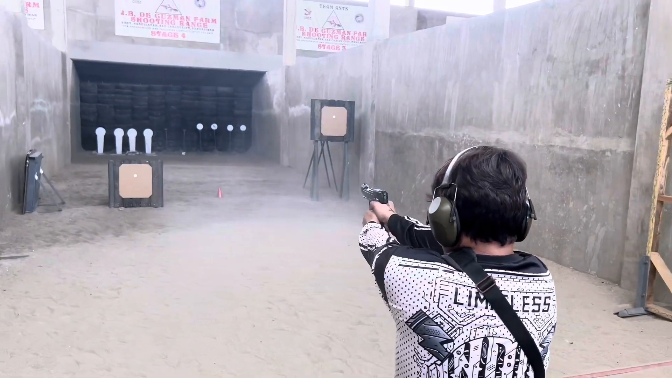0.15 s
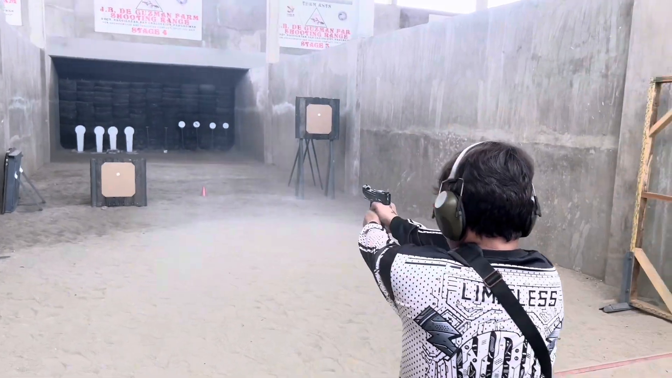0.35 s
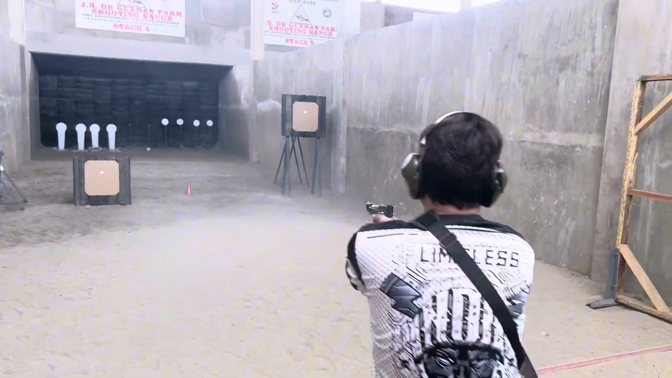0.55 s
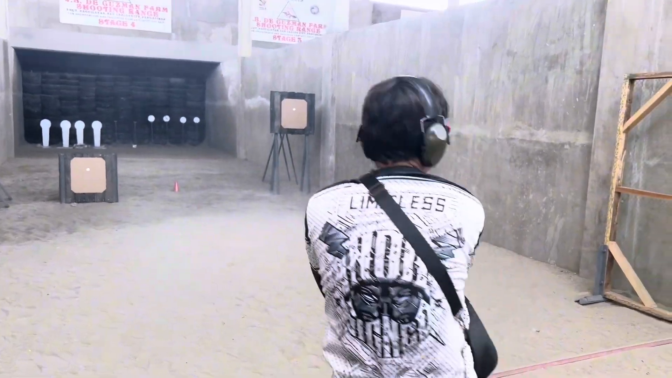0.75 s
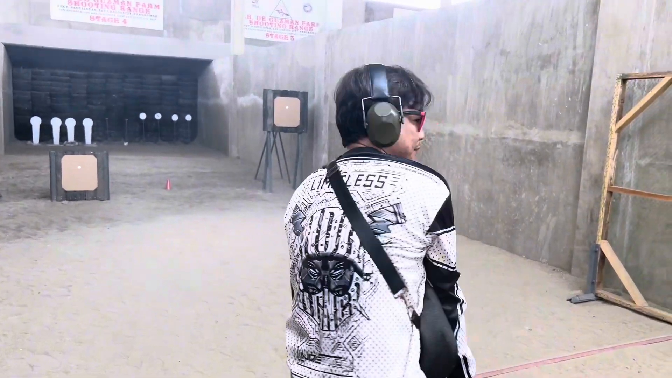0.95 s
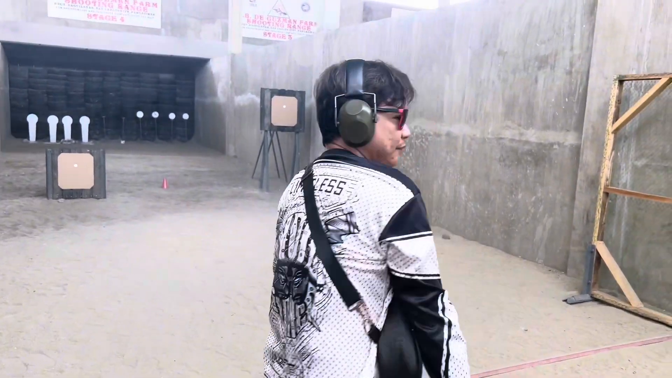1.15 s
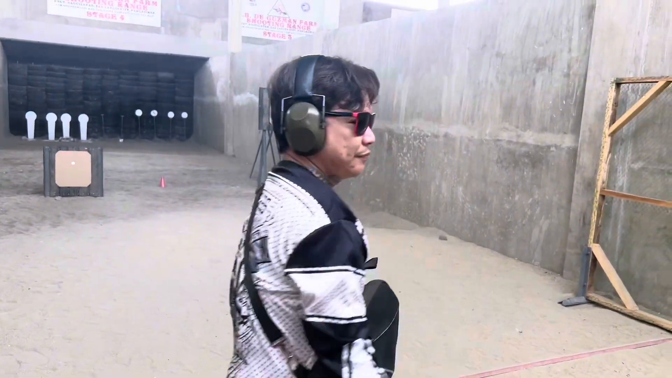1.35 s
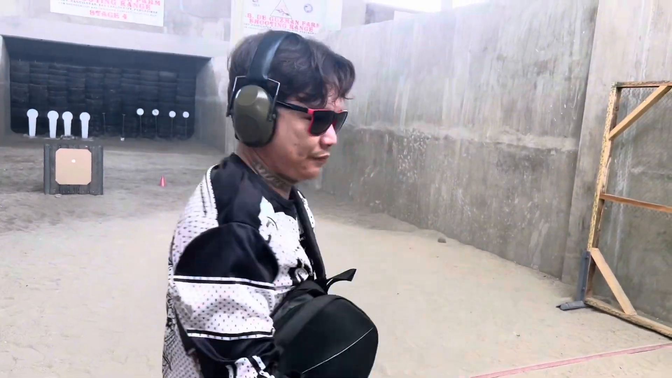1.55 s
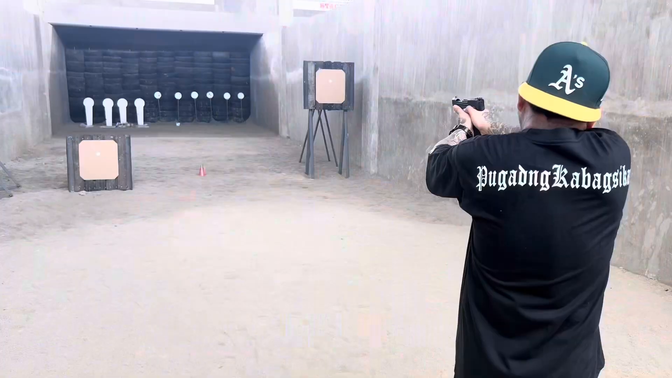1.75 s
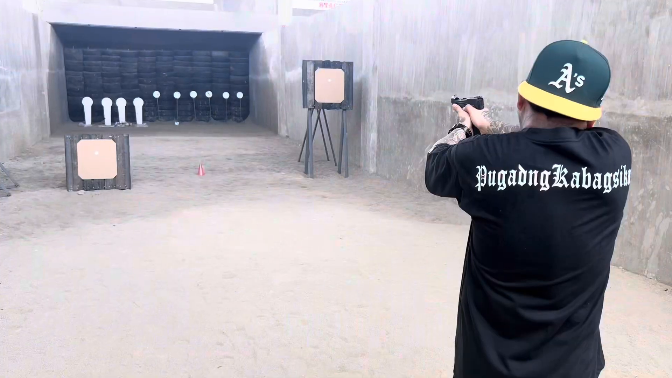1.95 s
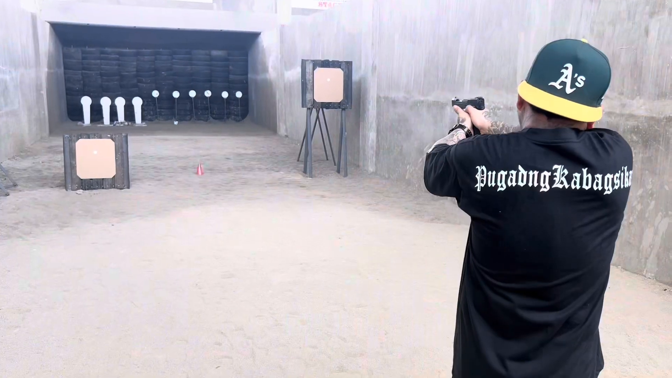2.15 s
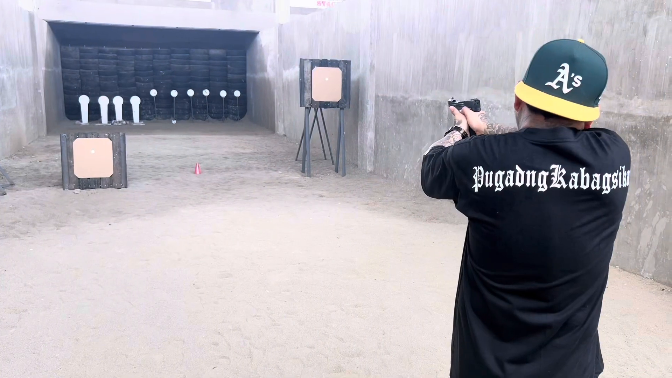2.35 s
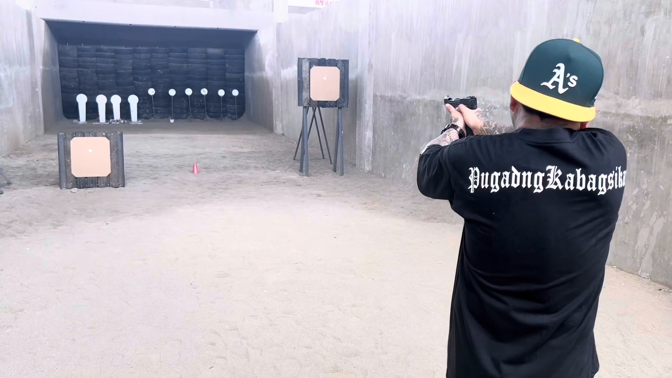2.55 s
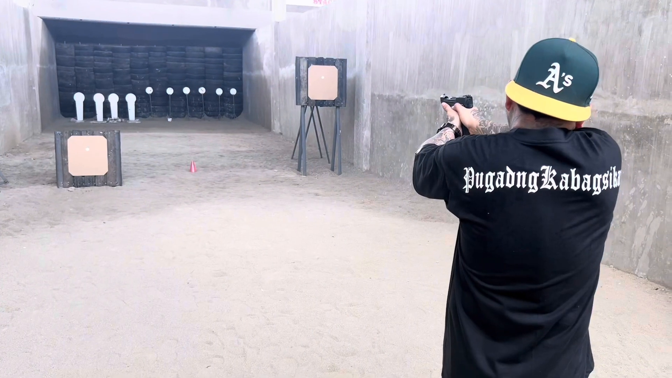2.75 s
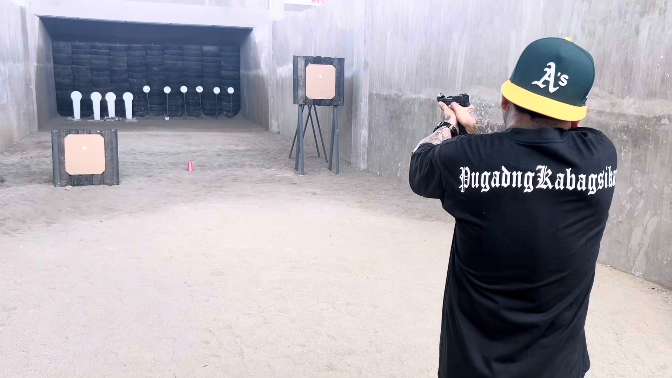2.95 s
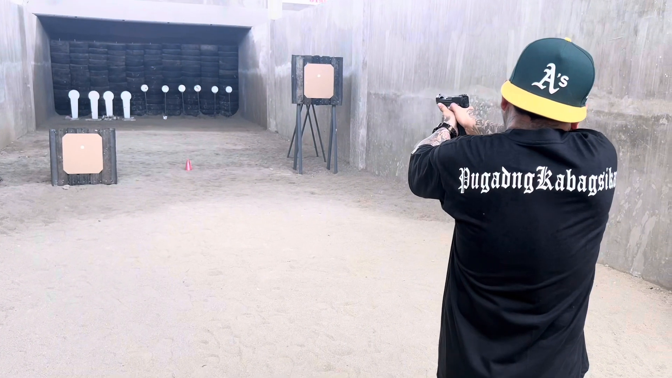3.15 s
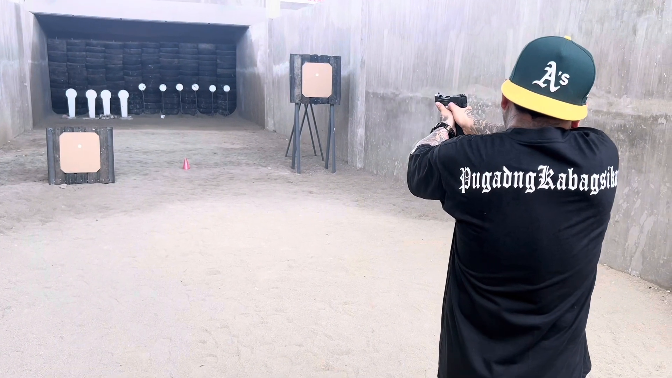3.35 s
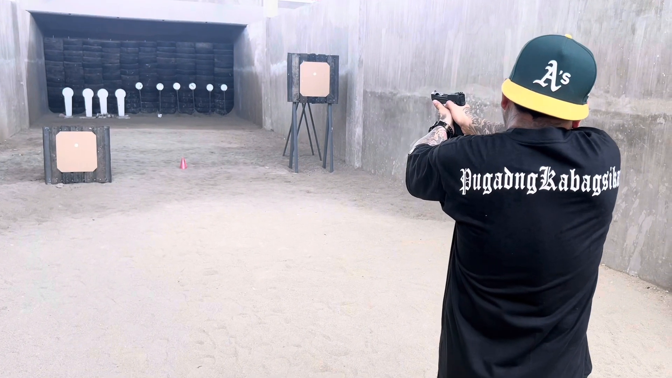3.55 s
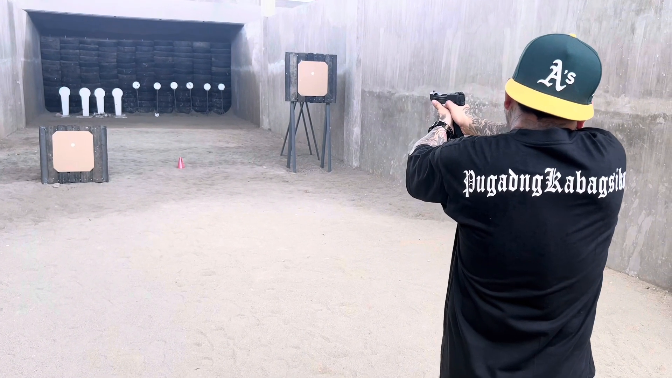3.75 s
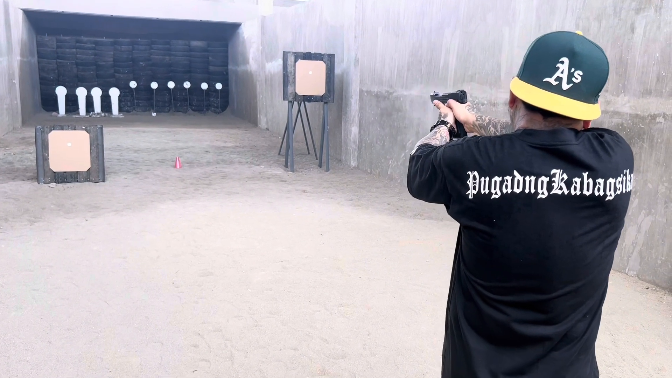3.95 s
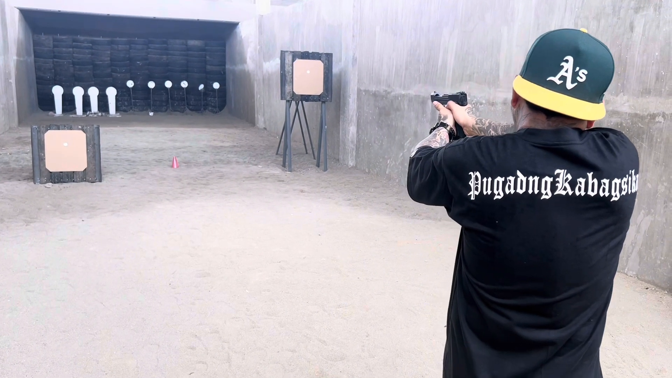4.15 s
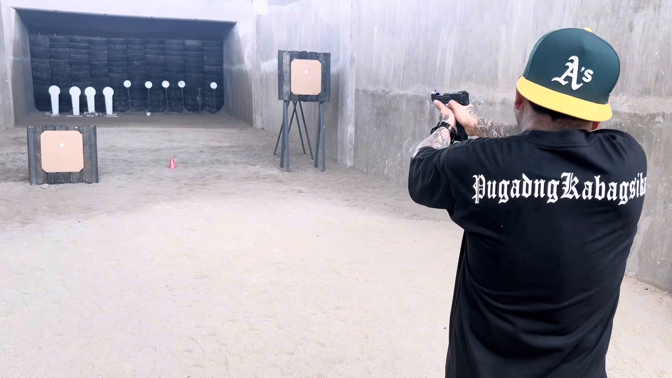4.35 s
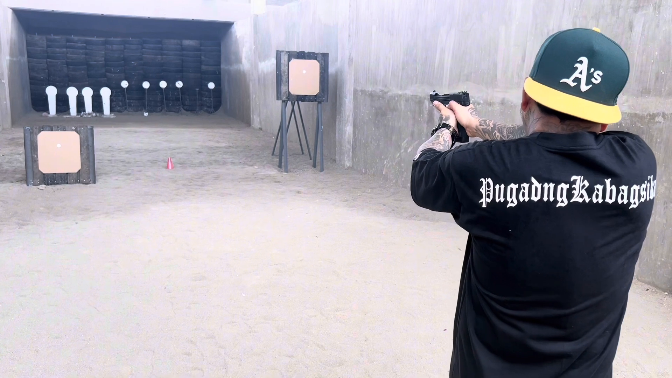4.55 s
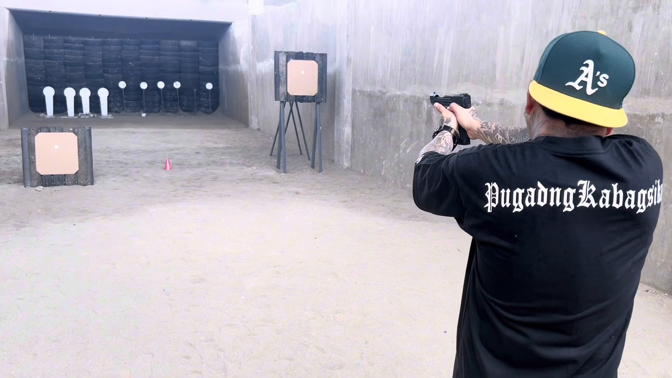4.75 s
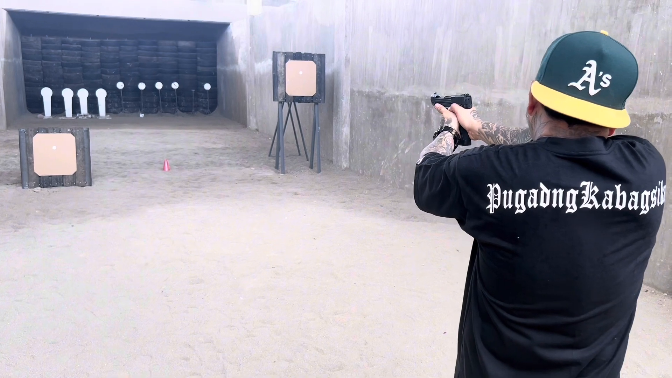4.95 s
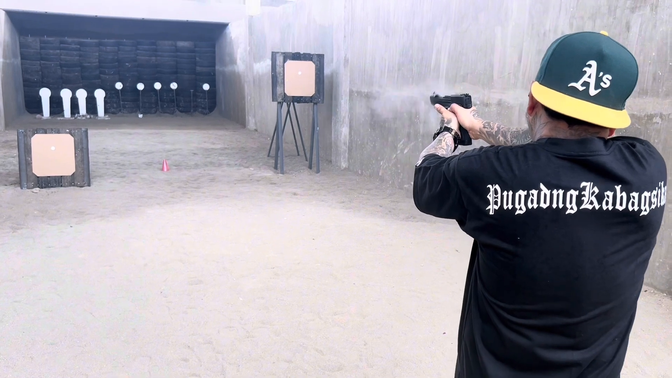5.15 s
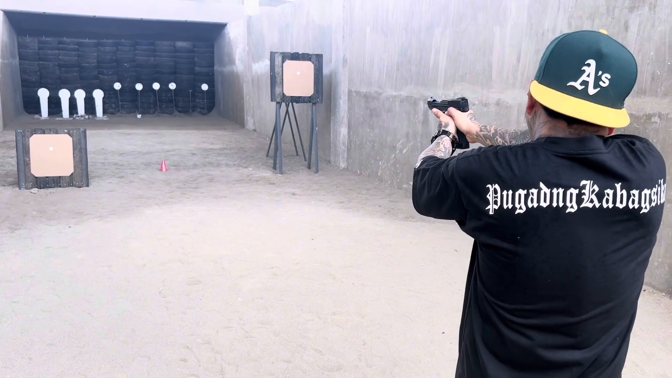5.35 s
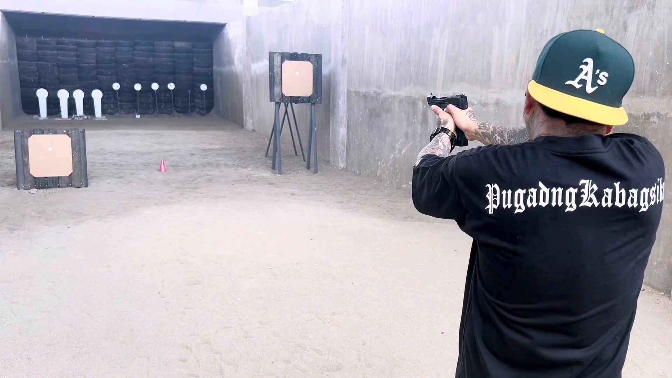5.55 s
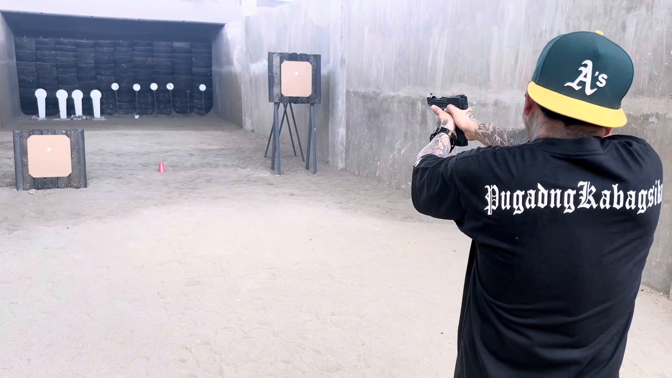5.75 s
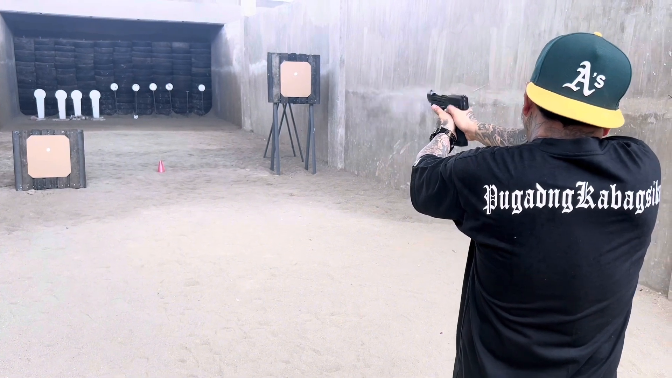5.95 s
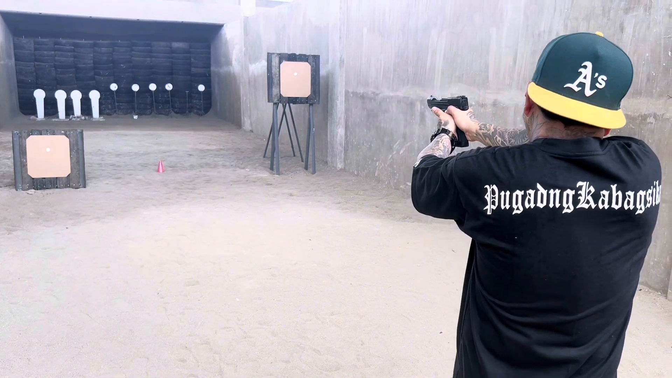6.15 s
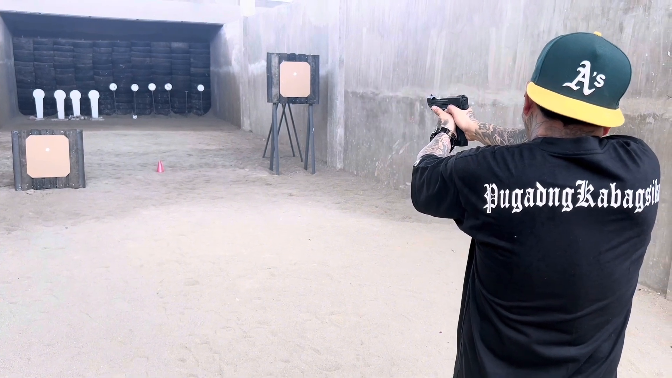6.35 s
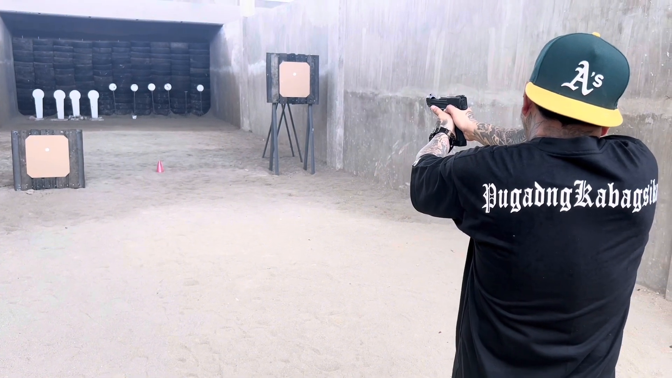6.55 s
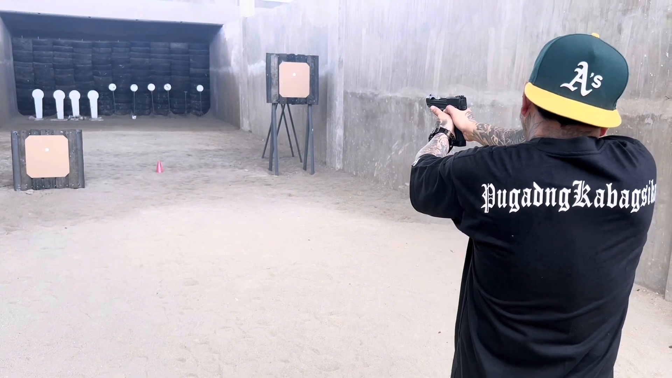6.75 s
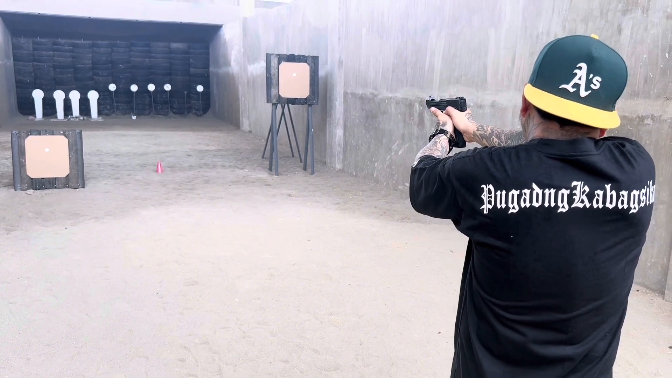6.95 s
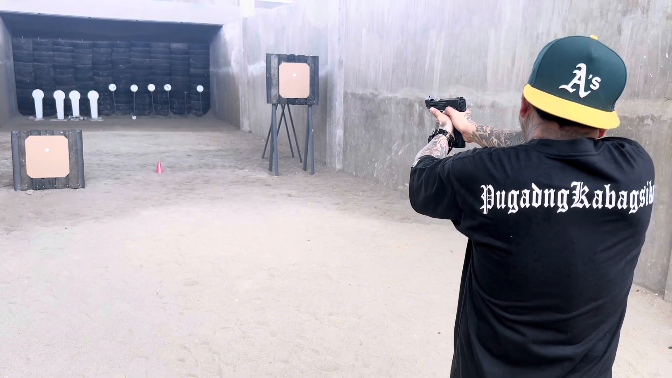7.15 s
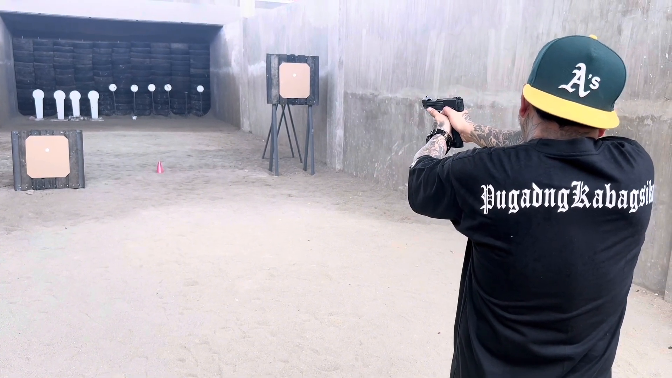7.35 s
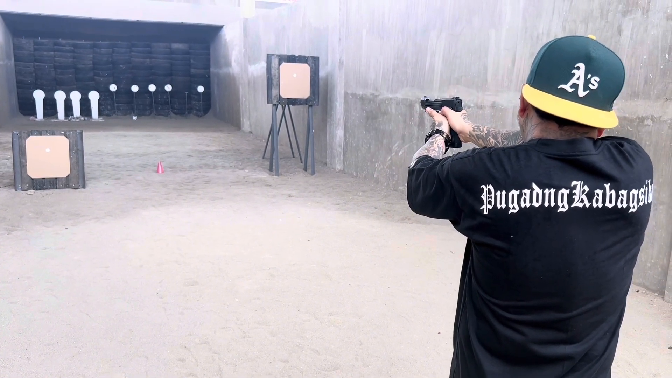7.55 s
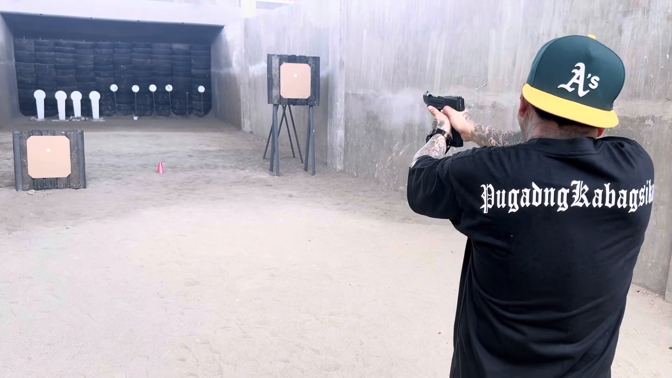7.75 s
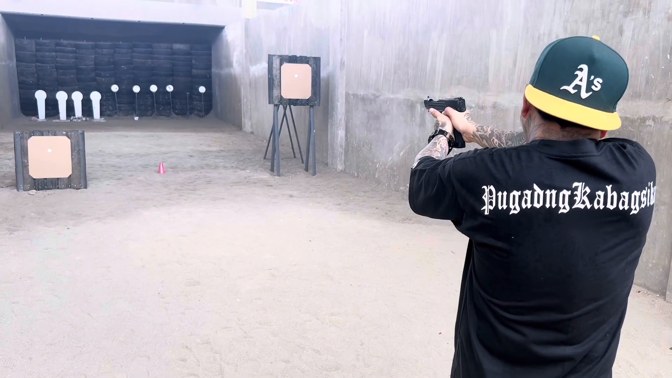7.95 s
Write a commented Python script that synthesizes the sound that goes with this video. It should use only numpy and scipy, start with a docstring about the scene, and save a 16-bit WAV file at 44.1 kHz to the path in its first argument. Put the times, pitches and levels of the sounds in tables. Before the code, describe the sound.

The clip opens on the reverberant tail of a pistol shot fired just before, fading over about a second into very faint rumble, hiss and hum. A tiny tick comes near 1.2 s. At about 1.7 s the background jumps up, with a brief low drone swell, then settles lower by 2.2 s. Six loud single shots follow at about 2.0, 3.0, 3.9, 5.1, 6.0 and 7.7 s. Each is an instant crack with a barking ground bounce, ragged slaps from concrete walls within an eighth of a second, a low thump and boom, and a dense wash dying over a second or so; the 3.0 s shot thumps hardest. At 4.0 s a bullet strikes steel: a bright splash, dull clank and thin shimmering ring. Light case or gear ticks appear near 3.7, 4.6, 4.8 and 6.8 s. The last echo is cut short. Stereo microphone a few metres behind the shooter.

```python
"""Pistol shots in an open concrete shooting bay, a few metres behind the shooter: one dies away, then six follow.
Each is a crack and ground bounce (spikes in ragged bursts), slaps off walls, a low thump and boom,
and a long wash of filtered noise. One bullet rings a steel plate (a noise splash and clank, beating sines).
Cases and gear tick (short noise bands) over rumble, hiss and a wavering hum whose drone briefly swells."""
import sys
import numpy as np
from scipy import signal
from scipy.fft import rfft, irfft, next_fast_len
from scipy.io import wavfile
from scipy.ndimage import uniform_filter1d

SR = 44100
rng = np.random.default_rng(int(sys.argv[2]) if len(sys.argv) > 2 else 0)


def store_wav(level_fs):
    """Save 16-bit WAV to argv[1]."""
    pcm = np.round(np.clip(np.atleast_2d(level_fs), -1, 1) * 32767)
    wavfile.write(sys.argv[1], SR, pcm.T.astype(np.int16))


N = 356769
RING = 2 * SR  # samples given to the echoes of one shot


def amp(db):
    """Decibels to gain."""
    return 10 ** (np.asarray(db) / 20)


def unit(x):
    """Scales to rms 1."""
    return x / np.sqrt(np.mean(x ** 2) + 1e-20)


def read(points, hz):
    """Reads a table along a log-frequency axis."""
    f, value = np.transpose(points)
    return np.interp(np.log(hz + 1), np.log(f + 1), value)


def sides(db):
    """Left and right gains for a left-minus-right difference."""
    return amp(np.array([[.5], [-.5]]) * db)


def bell(t, center, width):
    """Gaussian bump of height 1."""
    return np.exp(-.5 * ((t - center) / width) ** 2)


def add(mix, s, sound):
    """Mixes a sound in at a time in seconds, which may lie before the start."""
    at = round(s * SR)
    sound = sound[:, max(-at, 0):]
    part = mix[:, max(at, 0):][:, :sound.shape[1]]
    part += sound[:, :part.shape[1]]


# Stereo width. Each row: frequency in Hz, side minus mid in dB.
WIDTH_DB = [(60, -10), (92, -12.5), (140, -13), (210, -11.5), (330, -11), (500, -7.5), (770, -3),
            (1170, -1), (1790, 1.5), (2740, -1.5), (4190, -2), (6410, 0), (9810, -4), (15000, -6)]
# Microphone balance. Each row: frequency in Hz, left minus right in dB.
LEFT_RIGHT_DB = [(60, 1), (250, 0.4), (1000, 0.5), (2000, 0), (4000, 4), (8000, 3), (14000, -1.5)]


def diffuse(size):
    """Spectrum of white noise that reaches both microphones from all around."""
    hz = np.fft.rfftfreq(size, 1 / SR)
    mid, side = rng.standard_normal((2, len(hz))) + 1j * rng.standard_normal((2, len(hz)))
    width = amp(read(WIDTH_DB, hz))
    pair = np.array([mid + width * side, mid - width * side]) / np.hypot(1, width)
    return pair * sides(read(LEFT_RIGHT_DB, hz))


def fizz(center_hz, octaves):
    """One second of noise in a band that is bell-shaped over log frequency."""
    hz = np.fft.rfftfreq(SR, 1 / SR)
    return unit(irfft(diffuse(SR) * bell(np.log2((hz + 1) / center_hz), 0, octaves)))


# Background spectrum. Each row: frequency in Hz, level in dB per Hz.
AIR_SPECTRUM = [(15, -25.5), (28, -13), (48, -2), (80, -8), (120, -2), (165, -13), (240, -15.5),
                (350, -9.5), (520, -16.5), (800, -27), (1150, -24.5), (2500, -34.5), (4000, -41.5),
                (6200, -39.5), (7500, -50), (16000, -63.5)]
# Background steps: faint, up before the first close shot, then settled.
# Each row: start in seconds, rumble in dB, hiss in dB, hum in dB.
AIR_LEVELS = [(0, -66.5, -62, -71.5), (1.672, -53.5, -46.5, -58.5), (2.2, -62, -55, -61.5)]
# Hum lines. Each row: frequency in Hz, relative level in dB.
HUM_LINES = [(119.8, 4.5), (315, -15.5), (360, -5), (1150, -21)]


def background(split_hz=700, wander_hz=1.8, wander_rate_hz=9, drift_db=1.0, drift_rate_hz=4, throb_db=1.6):
    """Distant rumble and faint hiss are noise split by frequency; the machine hum is sines wavering in pitch and level."""
    size = 2 * next_fast_len(N // 2 + 1)
    hz, t = np.fft.rfftfreq(size, 1 / SR), np.arange(N) / SR
    starts, *levels = np.transpose(AIR_LEVELS)
    rumble, hiss, hum = (amp(db)[np.searchsorted(starts[1:], t)] for db in levels)

    air = unit(irfft(diffuse(size) * amp(read(AIR_SPECTRUM, hz))))
    low = irfft(rfft(air) / (1 + (hz / split_hz) ** 4))

    wander_noise = rfft(rng.standard_normal(size))
    wander = wander_hz * unit(irfft(wander_noise * np.exp(-hz / wander_rate_hz)))[:N]
    lines = sum(amp(db) * np.sin(2 * np.pi * np.cumsum(f + wander) / SR) for f, db in HUM_LINES)

    drift_noise = rfft(rng.standard_normal((2, size)))
    drift, throb = unit(irfft(drift_noise * np.exp(-hz / drift_rate_hz)))[:, :N]
    rumble = rumble * amp(drift_db * drift)
    hum = hum * amp(throb_db * throb)
    return rumble * low[:, :N] + hiss * (air - low)[:, :N] + hum * unit(lines)


# Drone swells. Each row: center in seconds, width in seconds, level in dB, frequency in Hz.
DRONE_SWELLS = [(1.755, 0.026, -52, 325), (1.77, .015, -61, 602), (1.785, 0.038, -50, 119),
                (1.81, .015, -61, 670), (1.925, .04, -55, 339), (1.95, .03, -49, 120.1)]


def drone_swells():
    """Brief rises of the low drone: sines under bell-shaped envelopes."""
    t, out = np.arange(N) / SR, np.zeros(N)
    for s, width_s, db, hz in DRONE_SWELLS:
        out += amp(db) * bell(t, s, width_s) * np.sin(2 * np.pi * (hz * t + rng.random()))
    return out


# Ticks of cases and gear. Each row: start in seconds, level in dB, center in Hz, spread in octaves, fade in seconds.
TICK_EVENTS = [(1.195, -82, 5500, 0.49, .03), (1.765, -68, 4500, .25, .05), (1.895, -67, 5184, .2, .05),
               (3.656, -45.5, 6300, 0.8, 0.0028), (4.568, -58.5, 5730, 0.62, .045),
               (4.63, -72, 12500, .2, .03), (4.779, -63.5, 9000, 0.4, 0.0033),
               (6.772, -59.5, 9300, 0.42, 0.0022)]


def ticks(echo_db=-22, echo_s=0.08):
    """Taps of cases and gear: decaying noise bands, each with a faint, slower echo tail from the bay."""
    out, t = np.zeros((2, N)), np.arange(SR) / SR
    for s, db, center_hz, octaves, fade_s in TICK_EVENTS:
        envelope = np.exp(-t / fade_s) + amp(echo_db) * np.exp(-t / echo_s)
        add(out, s, amp(db) * fizz(center_hz, octaves) * envelope)
    return out


# Plate hit, one row: start in seconds, ring in dB, splash of lead in dB, clank in dB.
STEEL_HIT = (4, -34.5, -25.5, -23)
# Plate modes. Each row: frequency in Hz, level relative to the ring in dB, t60 in seconds.
STEEL_MODES = [(4050, -2, .9), (5539, -3, .75), (6010, -2, .95), (7380, -4, .8), (8410, -5, .55),
               (8620, -7, .6), (9448, -6, .65), (11550, -9, .6), (12130, -8, .6)]


def plate(split_hz=45, splash_hz=9500, splash_fade_s=0.054, clank_hz=900, clank_octaves=0.37, clank_fade_s=0.067):
    """A bullet splashes on a steel plate, which clanks and rings high and thin; each mode is a beating pair."""
    out, t = np.zeros((2, N)), np.arange(SR) / SR
    s, ring_db, splash_db, clank_db = STEEL_HIT
    add(out, s, amp(clank_db) * fizz(clank_hz, clank_octaves) * np.exp(-t / clank_fade_s))
    add(out, s, amp(splash_db) * fizz(splash_hz, 0.38) * np.exp(-t / splash_fade_s))
    for hz, db, t60_s in STEEL_MODES:
        partner_hz = hz + split_hz * rng.uniform(0.58, 1.5)
        pair = sum(np.sin(2 * np.pi * (f * t + rng.random((2, 1)))) for f in (hz, partner_hz))
        add(out, s, pair / 2 * amp(ring_db + db - 60 * t / t60_s))
    return out


def echo_pattern(fade_s=0.21, size=30, count=3):
    """Dense echoes evened out in spectrum, so that the standing waves of the bay set their colour."""
    pattern, fade = diffuse(RING), np.exp(-np.arange(RING) / SR / fade_s)
    for _ in range(count):
        power = (abs(rfft(irfft(pattern) * fade)) ** 2).mean(0)
        pattern = pattern * np.sqrt(uniform_filter1d(power, 10 * size) / uniform_filter1d(power, size))
    return pattern


def clumps(patch_db=1.1, flutter_db=-1.0, size=3):
    """Echoes add up and cancel in places: dB over (frequency, frame) of the wash."""
    field = uniform_filter1d(rng.standard_normal((258, RING // 256 + 2)), size, axis=1)
    patches = unit(uniform_filter1d(field[1:], size, axis=0))
    return patch_db * patches + flutter_db * unit(field[0])


def grain(depth_db=3.2, fade_s=.16, rate_hz=260):
    """Early echoes come in bunches and merge into an even wash as the sound ages."""
    hz, t = np.fft.rfftfreq(RING, 1 / SR), np.arange(RING) / SR
    depth = depth_db * np.exp(-t / fade_s)
    bunches = unit(irfft(rfft(rng.standard_normal(RING)) * np.exp(-(hz / rate_hz) ** 2)))
    power_offset_db = np.log(10) / 20 * depth ** 2  # offsets the power that the bunching adds
    return amp(depth * np.clip(bunches, -2, 2) - power_offset_db)


# Returns from side and back walls. Each row: time after the shot in seconds, width in seconds, lift in dB.
WASH_SURGES = [(0.049, 0.014, 3.9), (0.122, 0.033, 2.9)]


def wash_swell(t, build_from_db=-9, build_s=0.0098):
    """Gain of the wash: it builds up quickly, then surges as the side walls and the back wall answer."""
    surges_db = sum(db * bell(t, s, width_s) for s, width_s, db in WASH_SURGES)
    return amp(build_from_db * np.exp(-(t / build_s) ** 2) + surges_db)


# Wash spectrum. Each row: frequency in Hz, level in dB per Hz.
WASH_SPECTRUM = [(25, -27), (55, -9), (110, 0.5), (160, -3), (210, 0.5), (400, 2), (750, 3), (1150, 3.5),
                 (1600, -0.5), (2000, -3.5), (2600, -4), (3200, -8.5), (4200, -9), (6000, -10.5),
                 (9500, -11), (12300, -10.5), (16000, -21.5)]
# Wash decay. Each row: frequency in Hz, t60 in seconds.
WASH_T60 = [(60, 0.46), (150, 1.264), (400, 1.49), (1300, 1.41), (2500, 1.185), (5000, 1.033), (8000, 0.78),
            (12000, 0.61), (16000, 0.43)]
# Standing waves of the bay. Each row: frequency in Hz, width in Hz, lift in dB.
STANDING_WAVES = [(185, 30, 4.6), (252, 18, 5.1), (381, 30, 5.4), (454, 12, 2.9), (485, 19, 4.2),
                  (620, 22, 4.8), (646, 16, 6.8), (692, 17, 3.3), (800, 30, 4.3), (864, 29, 3.2),
                  (940, 17, 5.8), (1006, 17, 4.6), (1128, 30, 6.6), (1227, 30, 2.8), (1409, 30, 3.1),
                  (1647, 30, 4.3), (1769, 20, 3.7), (1875, 30, 3.4)]


def wash(pattern, clump_db, bright_db, bass_db, share=0.985, steady_hz=3600, gas_hz=60, bass_hz=150, modes_fade_s=0.25):
    """Dense echoes share a pattern; bass and treble vary with the gas cloud and small moves of the gun.
    Standing waves colour the start and scatter with age; each band decays at its own rate."""
    hz, t = np.fft.rfftfreq(RING, 1 / SR), np.arange(RING) / SR
    same = np.clip(share, 0, 1) / (1 + (hz / steady_hz) ** 2) * hz / np.hypot(hz, gas_hz)
    tilt_db = bright_db * np.log2((hz + 100) / 1000)
    colour_db = read(WASH_SPECTRUM, hz) + tilt_db + bass_db / (1 + (hz / bass_hz) ** 4)
    modes_db = np.max([db / (1 + (2 * (hz - f) / width) ** 2) for f, width, db in STANDING_WAVES], axis=0)

    echoes = (same * pattern + np.sqrt(1 - same ** 2) * diffuse(RING)) * amp(colour_db)
    standing = np.exp(-(t / modes_fade_s) ** 2)
    noise = standing * unit(irfft(echoes * amp(modes_db))) + (1 - standing) * unit(irfft(echoes))

    f, age_s, z = signal.stft(noise, SR, nperseg=512)
    decay_db = -60 * age_s / read(WASH_T60, f)[:, None]
    dying = signal.istft(z * amp(decay_db + clump_db), SR, nperseg=512)[1]
    return dying[:, :RING] * wash_swell(t)


def low_noise(low_hz, high_hz, size):
    """Diffuse noise in a low band, rms 1."""
    band = signal.butter(2, [low_hz, high_hz], "band", fs=SR, output="sos")
    return unit(signal.sosfilt(band, irfft(diffuse(SR)))[:, -size:])


def boom(low_hz=43, high_hz=72, rise_s=0.027, fade_db_per_s=150):
    """The deepest part of the blast lingers between the walls: fading low noise."""
    t = np.arange(SR // 2) / SR
    return low_noise(low_hz, high_hz, len(t)) * np.minimum(t / rise_s, 1) * amp(-fade_db_per_s * t)


def churn(peak_s=0.037, width_s=0.0099, back_s=.122, back_db=-5, low_hz=55, high_hz=180, rise_s=0.0045):
    """A short low churn around the thump, which the back wall returns: low noise in two bulges."""
    t = np.arange(SR // 4) / SR
    bulges = bell(t, peak_s, width_s) + amp(back_db) * bell(t, back_s, width_s)
    return low_noise(low_hz, high_hz, len(t)) * bulges * np.minimum(t / rise_s, 1)


def push(t, width_s):
    """One rounded push of air between two suctions."""
    u = t / width_s
    return (1 - u ** 2) * np.exp(-u ** 2 / 2)


def thump(push_s, push_db, push_width_s=.0023, push_pan_db=8, right_lead_s=0.0048,
          snap_lead_s=0.0029, snap_width_s=0.0014, snap_db=-4,
          rebound_s=.0295, rebound_width_s=.0036, rebound_db=-2):
    """Muzzle gas: a sharp suction and a hard push, the push sweeping across the microphones, and a broader rebound."""
    t = np.arange(SR // 4) / SR
    sweep = sides(push_pan_db) * push(t - push_s + np.array([[0], [right_lead_s]]), push_width_s)
    snap = amp(snap_db) * push(t - push_s + snap_lead_s, snap_width_s)
    rebound = amp(rebound_db + push_db / 2) * push(t - rebound_s, rebound_width_s)
    return amp(push_db) * (sweep - snap) + rebound


def pulse(spectrum, size=2048):
    """The sharpest causal (minimum-phase) pressure pulse with this spectrum, energy 1."""
    log_gain = np.log(amp(read(spectrum, abs(np.fft.fftfreq(size, 1 / SR)))))
    shape = np.fft.ifft(np.exp(np.conj(signal.hilbert(log_gain)))).real
    return shape / np.linalg.norm(shape)


def arrival(spectrum, delay_ms, db, pan_db, smear_ms, bright_db_per_octave, spike, size=512):
    """The blast along one path: a spike inside a brief ragged burst, dulled or sharpened by what it met."""
    out, ms = np.zeros((2, RING)), np.arange(size) * 1000 / SR
    shape = pulse([(hz, level + bright_db_per_octave * np.log2(hz)) for hz, level in spectrum])[None]
    spray = irfft(diffuse(size)) * (ms / smear_ms) * np.exp(-ms / smear_ms * 1.41)
    spray /= np.linalg.norm(spray, axis=1, keepdims=True)
    burst = spike * (np.arange(size) == np.searchsorted(ms, smear_ms)) + spray
    hit = signal.fftconvolve(burst, shape, axes=1)
    hit /= np.linalg.norm(hit, axis=1, keepdims=True)
    add(out, delay_ms / 1000, amp(db) * sides(pan_db) * hit)
    return out


# Slap spectrum. Each row: frequency in Hz, level in dB per Hz.
SLAP_SPECTRUM = [(40, -22), (200, -2.5), (500, -1.5), (1000, 2), (1600, -7), (3000, -10.5), (6000, -27),
                 (9000, -27.5), (16000, -44.5)]
# Two clusters: sharp from the side walls, duller by way of the back wall.
# Each row: delay in ms, relative level in dB, left minus right in dB, brightness in dB per octave.
SLAP_PATHS = [(11.02, -11.5, -1.5, 5), (15.53, -6, 3.5, -0.5), (25.86, -12.5, -3.5, 5), (31.2, -6, 1.5, -3),
              (35.5, -12.5, 1.5, 3.5), (40.53, -8, -2, 1.5), (42.02, -3, 5.5, -4), (44.3, -1.5, 3, 2),
              (45.8, -9.5, 0, 4), (52.2, -10.5, 1, -2.5), (63.1, -9, -1, 6.5), (76.3, -9, 5.5, -1.5),
              (91.4, -15, 1.5, -1.5), (95.7, -4, -1.5, -2), (105.1, -10, 1.5, 3), (110, -7.5, 2.5, -4.5),
              (118.7, -10.5, 7, -2), (121.9, -10.5, 6, 0), (127.6, -14.5, -2, -2), (132.9, -3.5, 1, -1.5)]


def wall_slaps(slap_db=10, smear_ms=0.65):
    """Separate returns of the blast from the side walls and the back wall."""
    return amp(slap_db) * sum(arrival(SLAP_SPECTRUM, delay_ms, db, pan_db, smear_ms, bright_db, spike=0.89)
                              for delay_ms, db, pan_db, bright_db in SLAP_PATHS)


# Ground bounce spectrum, duller and barking. Each row: frequency in Hz, level in dB per Hz.
BOUNCE_SPECTRUM = [(40, -25), (200, -4.5), (500, 3), (800, 2.5), (1400, -3.5), (2000, 4.5), (2600, 7),
                   (3700, -11.5), (4600, -15.5), (5700, -6.5), (7000, -18.5), (9000, -16), (16000, -22)]


def ground_bounce(delay_ms, ground_db, bounce_db=8):
    """The blast off the ground, just behind the crack and leaning left."""
    return arrival(BOUNCE_SPECTRUM, delay_ms, bounce_db + ground_db, pan_db=1.5, smear_ms=0.21,
                   bright_db_per_octave=0, spike=1.6)


# Crack spectrum. Each row: frequency in Hz, level in dB per Hz.
CRACK_SPECTRUM = [(40, -28), (170, -1.5), (350, 8.5), (700, 5.5), (1000, 6.5), (1400, 0.5), (1900, 3.5),
                  (2600, -4), (3500, -12), (4700, -11), (5700, -0.5), (7000, -10), (12000, -7),
                  (16000, -16)]


def muzzle_crack(crack_db=9):
    """The blast straight from the muzzle, leaning left."""
    return arrival(CRACK_SPECTRUM, 0, crack_db, pan_db=5.5, smear_ms=0.66,
                   bright_db_per_octave=0.0035, spike=0.56)


# Shots. Each row: start in seconds, level in dB (all but the thump), ground bounce in dB, its delay in ms,
# wall slaps in dB, thump in dB, its delay in seconds, lingering bass in dB, wash brightness in dB per octave.
PISTOL_SHOTS = [(-0.36, -4.5, 0, 4.5, 0, 0, 0.025, 3, 0.33),
                (2.0142, -0.56, -1, 4.46, 0.5, -8, 0.024, -5, 0.25),
                (3.0259, -1.38, -1, 4.76, -0.5, 10.5, 0.019, 1.5, 0.5),
                (3.8997, -1.7, -1, 5, 0.5, 0.5, 0.018, 1.5, 0.5),
                (5.113, -1.5, -4.5, 4.8, -1.5, 3, 0.0225, -1, 0.46),
                (5.963, -1.73, 0, 4.67, -1, -2, 0.01, 3, 0.48), (7.745, -1, 2, 5.3, -3, 0, 0.018, -2, 0)]


def pistol(wash_db=-15.5, thump_db=-18, churn_db=-30, boom_db=-28):
    """Each shot: direct crack and ground bounce, wall slaps, thump, lingering bass and wash."""
    out = np.zeros((2, N))
    pattern, clump_db, bunching, slaps = echo_pattern(), clumps(), grain(), wall_slaps()  # shared by all shots
    for s, db, ground_db, ground_ms, walls_db, low_db, push_s, bass_db, bright_db in PISTOL_SHOTS:
        direct = muzzle_crack() + ground_bounce(ground_ms, ground_db)
        tail = amp(wash_db) * bunching * wash(pattern, clump_db, bright_db, bass_db)
        add(out, s, amp(db) * (direct + amp(walls_db) * slaps + tail))
        add(out, s, amp(thump_db) * thump(push_s, low_db))
        add(out, s, amp(db + bass_db + churn_db) * churn())
        add(out, s, amp(db + bass_db + boom_db) * boom())
    return out


def scene():
    """Everything heard in the bay."""
    return background() + drone_swells() + ticks() + plate() + pistol()


# Treble notches. Each row: frequency in Hz, width in Hz.
TREBLE_NOTCHES = [(10150, 1600), (10500, 1600), (14000, 800)]


def record(dry, low_cut_hz=42, edge_hz=16200):
    """Deep bass is cut, narrow treble notches are made and peaks are rounded off; then the band limit."""
    heard = signal.sosfilt(signal.butter(4, low_cut_hz, "highpass", fs=SR, output="sos"), dry)
    for hz, width_hz in TREBLE_NOTCHES:
        heard = signal.lfilter(*signal.iirnotch(hz, hz / width_hz, fs=SR), heard)
    band_limit = signal.firwin(511, edge_hz, window=("kaiser", 9), fs=SR)[None]
    return signal.oaconvolve(np.tanh(heard), band_limit, "same")


dry = scene()
out = record(dry)
store_wav(out)
```